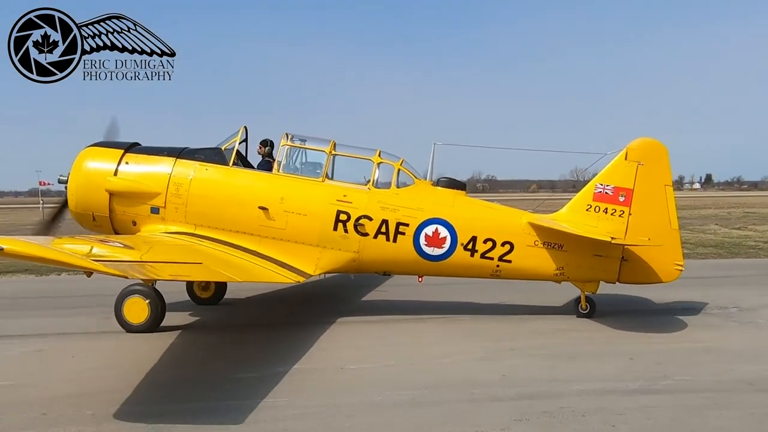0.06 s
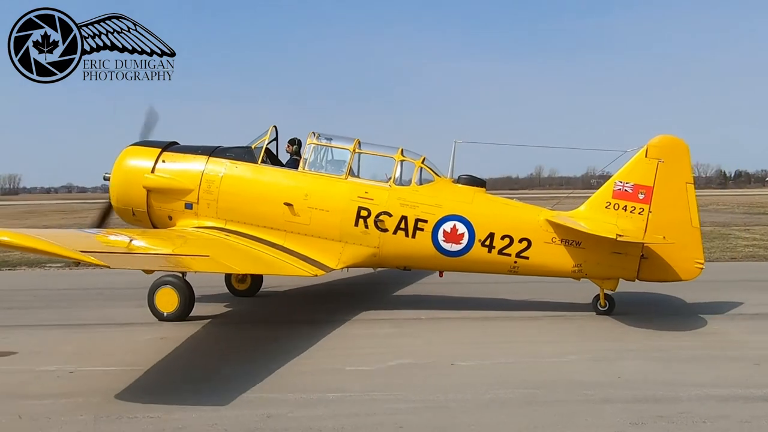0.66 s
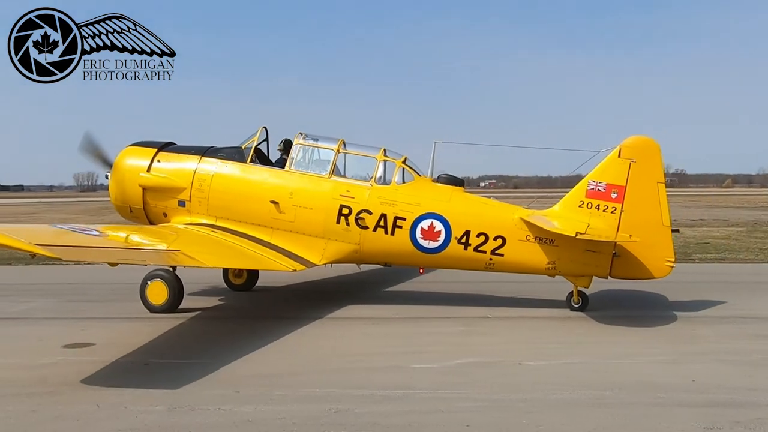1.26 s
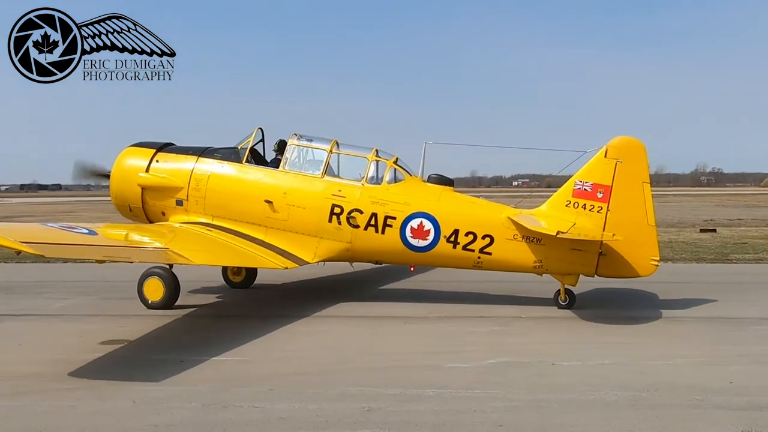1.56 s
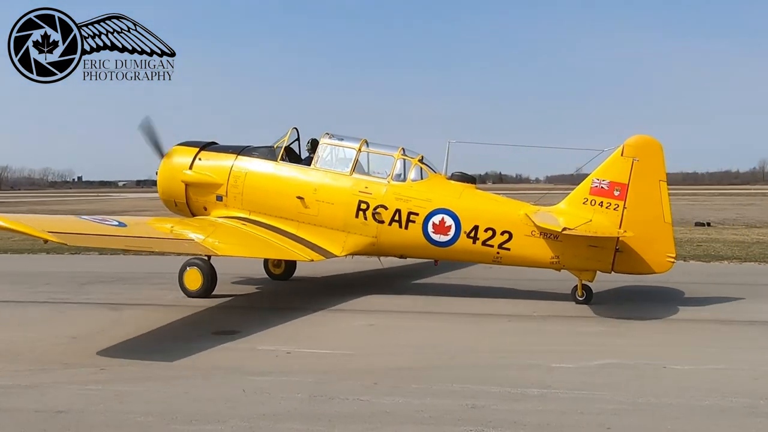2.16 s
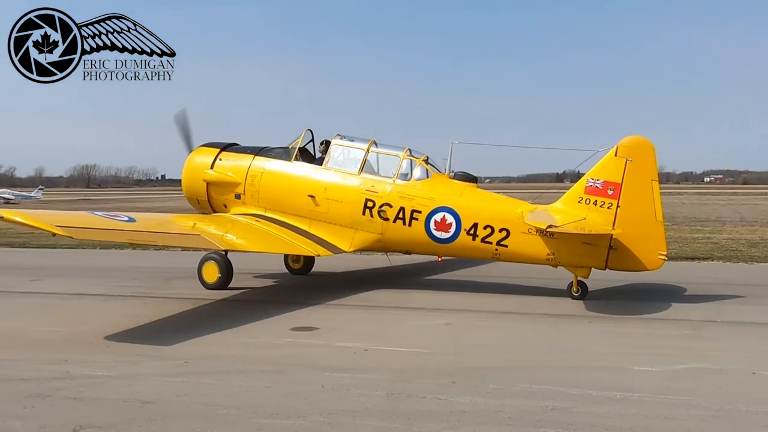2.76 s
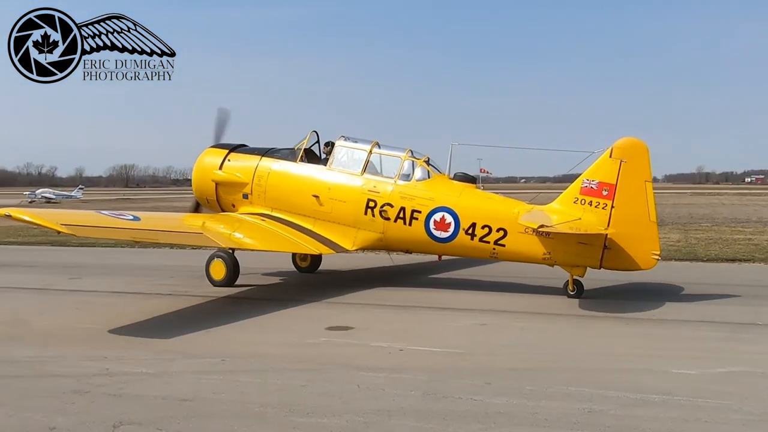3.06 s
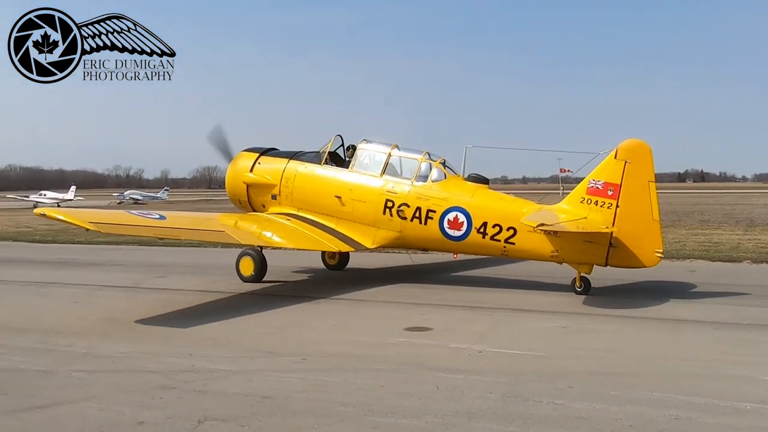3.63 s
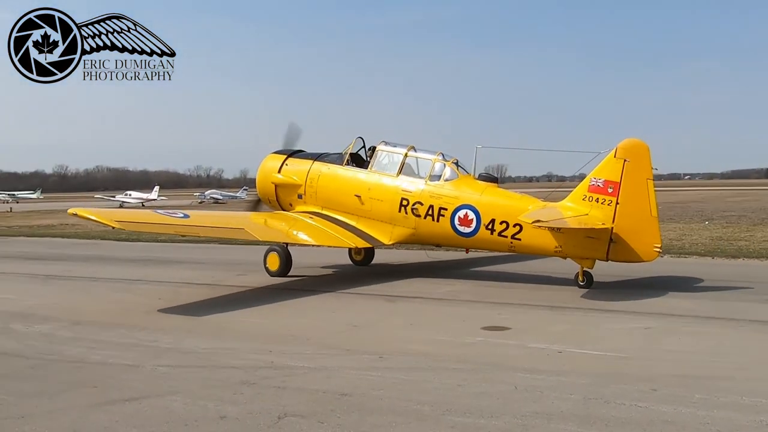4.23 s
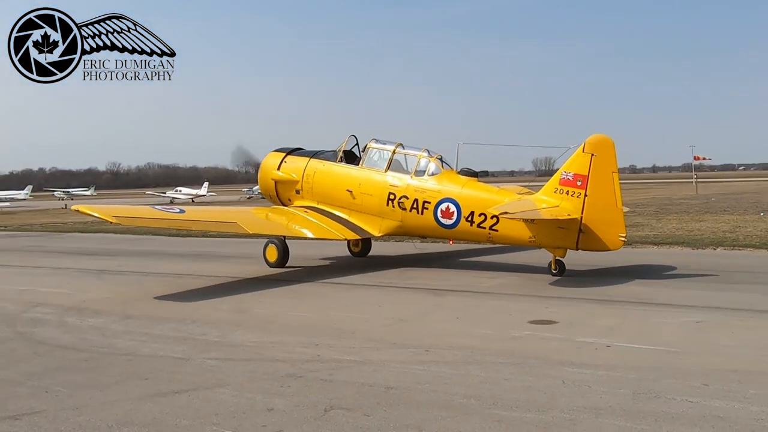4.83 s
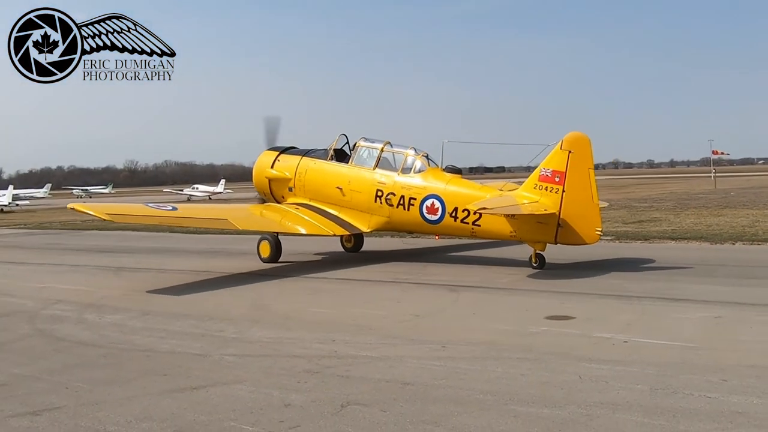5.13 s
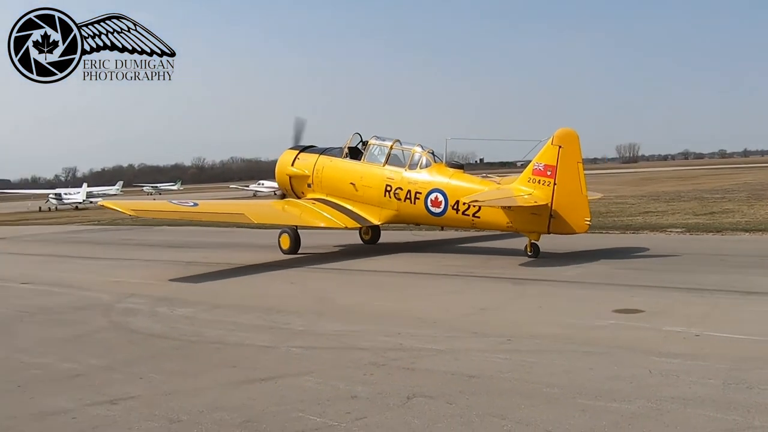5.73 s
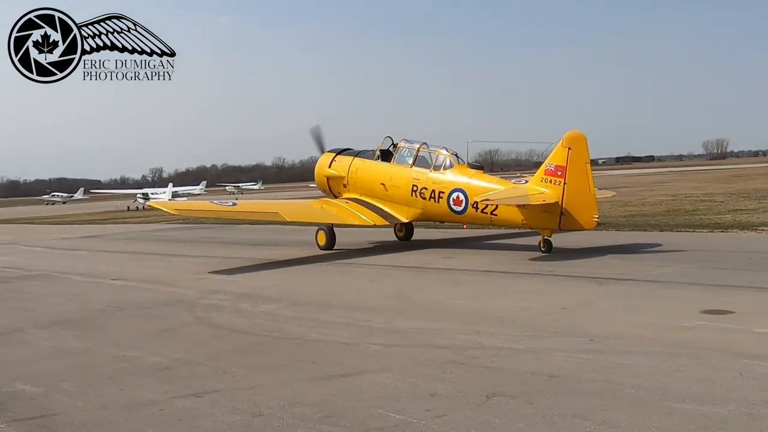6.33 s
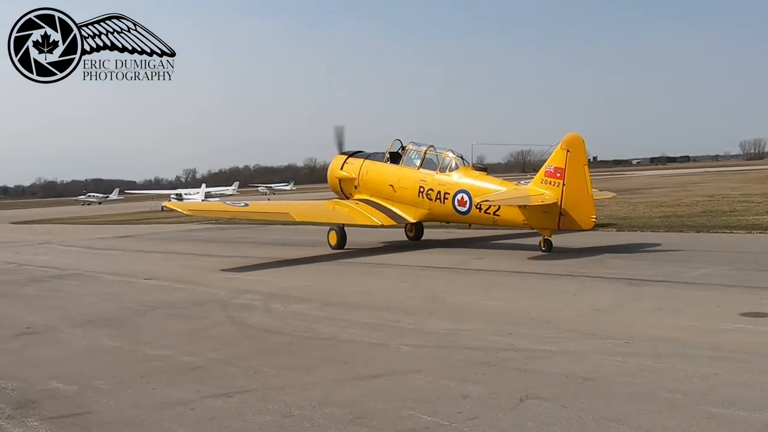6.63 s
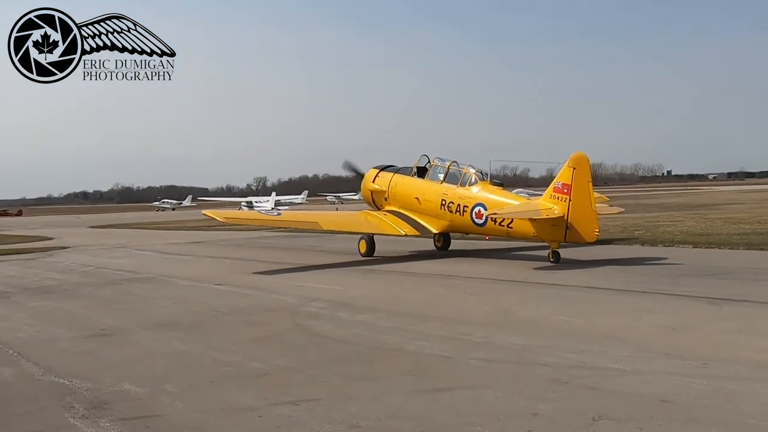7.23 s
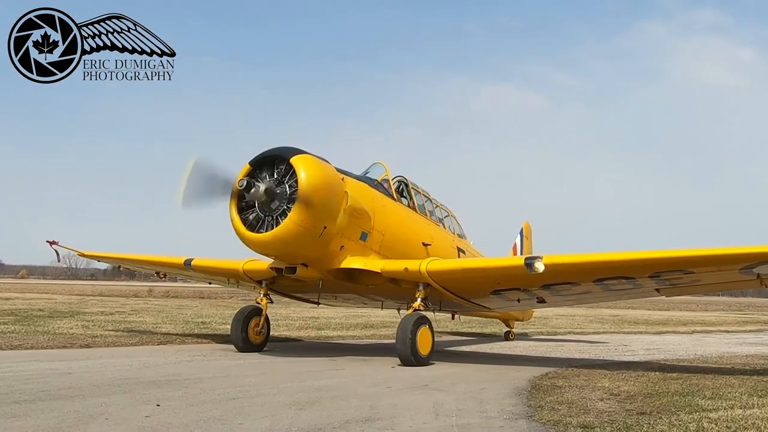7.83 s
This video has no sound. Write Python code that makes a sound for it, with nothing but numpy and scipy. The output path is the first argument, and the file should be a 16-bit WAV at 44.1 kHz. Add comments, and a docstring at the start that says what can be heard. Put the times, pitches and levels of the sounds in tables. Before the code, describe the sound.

Outdoors beside a taxiway, a radial aircraft engine lopes past with a deep, uneven drone and sputtering exhaust, slowing and then speeding up. Two nearby camera shutter clicks and faint brake squeaks come through the propeller's swish and hollow slaps. The exhaust grows throatier as the plane swings away. A sudden cut leads to a short moment of brighter propeller rush with a faint gear whine.

```python
"""A nine-cylinder radial trainer taxis past and turns away, the throttle easing, then opening.
Its firings drone, lope and pop in the exhaust; the two-blade propeller swishes, and slaps in gusts.
A camera shutter snaps twice nearby; the brakes squeak faintly. After an abrupt break a trainer
is heard from the front: brighter propeller wash and a faint gear whine."""
import sys
import numpy as np
from scipy import signal
from scipy.fft import rfft, irfft
from scipy.io import wavfile
from scipy.ndimage import uniform_filter1d, minimum_filter1d

SR = 44100
rng = np.random.default_rng(int(sys.argv[2]) if len(sys.argv) > 2 else 0)


def wav_record(signal):
    """Record a signal, one row per channel, as 16-bit PCM in the file named by sys.argv[1]."""
    frames = np.transpose(np.atleast_2d(signal))
    bounded = np.clip(frames, -1, 1)
    # unit amplitude maps onto the largest positive 16-bit level
    quanta = np.round(bounded * 32767).astype(np.int16)
    wavfile.write(sys.argv[1], SR, quanta)


N = 352359
T = np.arange(N) / SR
CYLINDERS, REVS_PER_CYCLE, BLADES = 9, 2, 2


def from_db(db):
    """Decibels to gain."""
    return 10 ** (np.asarray(db) / 20)


def rms_one(x):
    """Scale to unit rms."""
    return x / np.sqrt(np.mean(x ** 2) + 1e-20)


def in_time(rows):
    """Curve of (seconds, value) rows at every sample."""
    return np.interp(T, *np.transpose(rows))


def noise():
    """White noise."""
    return rng.standard_normal(N)


def coloured(x, colour):
    """Filter to a colour, rms 1. Each row: frequency in Hz, relative level in dB."""
    hz, db = np.transpose(colour)
    log_hz = np.log(np.maximum(np.arange(N // 2 + 1) * SR / N, 1))
    beyond = np.abs(log_hz - np.clip(log_hz, np.log(hz[0]), np.log(hz[-1])))
    gain = from_db(np.interp(log_hz, np.log(hz), db) - 20 * beyond)
    return rms_one(irfft(rfft(x) * gain, N))


def drift(rate_hz):
    """Slow random wander, rms 1."""
    hop = 40
    r = np.exp(-2 * np.pi * rate_hz * hop / SR)
    slow = signal.lfilter([1], [1, -2 * r, r * r], rng.standard_normal(N // hop + 2002))[2000:]
    return np.interp(np.arange(N) / hop, np.arange(len(slow)), rms_one(slow))


def resonate(x, hz, widths_hz):
    """Two-pole resonances in series, one per width; rms 1."""
    for width_hz in widths_hz:
        r = np.exp(-np.pi * width_hz / SR)
        feedback = [1, -2 * r * np.cos(2 * np.pi * hz / SR), r * r]
        x = signal.lfilter(np.array([1, 0, -1]) * (1 - r * r) / 2, feedback, x)
    return rms_one(x)


def tone(turns, scatter_turns=1):
    """Sine of rms 1 with a random starting phase."""
    return np.sqrt(2) * np.sin(2 * np.pi * (turns + scatter_turns * rng.random()))


def burst(start_s, rise_s, decay_s):
    """Envelope: linear rise, exponential decay."""
    age_s = np.maximum(T - start_s, 0)
    decay = np.exp(-np.minimum(np.maximum(age_s - rise_s, 0) / decay_s, 20))
    return np.minimum(age_s / rise_s, 1) * decay


def bell(centre_s, half_s, db):
    """Gain of a bell-shaped swell."""
    return from_db(db) * np.exp(-((T - centre_s) / half_s) ** 2)


def puffs(turns, rise_turns, uneven_db, steady):
    """Noise that swells once a turn, at random strength, over a steady share."""
    strength = from_db(uneven_db * np.clip(rng.standard_normal(2000), -2, 2))[turns.astype(int)]
    age = (turns % 1) / rise_turns
    return noise() * (steady + strength * age ** 2 * np.exp(2 * (1 - age)))


def knock(start_s, hz, rise_s, air):
    """Short thump: a sine and air noise under one rounded envelope."""
    age_s = np.clip(T - start_s, 0, rise_s * 20)
    swell = (age_s / rise_s * np.exp(1 - age_s / rise_s)) ** 2
    return swell * (np.sin(2 * np.pi * hz * age_s) + air)


def exhaust(cycles, drone_db, overtone_db, rumble_db, bark_db, behind):
    """Firings drone; unequal pipes add throbbing overtones, uneven combustion rumble and bark."""
    # Each row: multiple of the four-stroke cycle rate, relative dB side on, relative dB from behind.
    pipe_orders = [(7, -3.5, -3), (8, -3.5, -16.5), (11, -6.5, -17), (12, -7.5, -15), (14, 4, 2),
                   (15, -2, -7.5), (16, -3.5, 2.5), (18, -9, -2.5), (20, 1, -7.5), (21, -4.5, -5),
                   (22, -7.5, -9.5), (23, -11, -9.5), (24, -14, -13), (26, -13, -16), (27, -8.5, -13.5),
                   (28, -13, -11.5), (32, -19.5, -13), (33, -18, -12), (37, -17, -16.5)]
    # Spectra. Each row: frequency in Hz, relative level in dB.
    rumble_colour = [(15, -22.5), (25, -6), (36, 3.5), (52, 0), (80, 0), (125, 0), (160, -8), (210, -11.5),
                     (420, -45)]
    bark_colour = [(110, -32), (170, 7), (230, 0.5), (320, -2), (420, -5.5), (650, -16), (1500, -40)]
    # Relative bark of each cylinder, in firing order.
    cylinder_db = [2, -3, 0, -3.5, 2, -1, 0, 2, -6]
    firings = cycles * CYLINDERS
    drone = from_db(drone_db) * tone(firings)
    overtones = 0
    for order, side_db, rear_db in pipe_orders:
        db = side_db + behind * (rear_db - side_db) + 2.5 * drift(2)
        overtones += from_db(db) * tone(order * cycles, scatter_turns=0.6)
    overtones = from_db(overtone_db) * rms_one(overtones)
    long_puffs = puffs(firings, rise_turns=0.29, uneven_db=-0.5, steady=0.46)
    rumble = from_db(rumble_db) * coloured(long_puffs, rumble_colour)
    cylinder_gain = from_db(cylinder_db)[firings.astype(int) % CYLINDERS]
    short_puffs = cylinder_gain * puffs(firings, rise_turns=0.15, uneven_db=3, steady=0.69)
    bark = from_db(bark_db) * coloured(short_puffs, bark_colour)
    return drone + overtones + rumble + bark


def sputter_gain(edge_db=-4):
    """Bouts of extra bark after throttle changes."""
    # Each row: start in seconds, end in seconds, mid-bout level in dB.
    bouts = [(-.15, 0.124, -39), (0.153, 1.453, -44.5), (1.48, 1.833, -43), (2.603, 3.113, -46.5),
             (3.444, 3.62, -43.5), (4.043, 4.47, -43.5), (5.15, 5.516, -44.5)]
    gain = 0
    for start_s, end_s, db in bouts:
        place = np.clip(2 * (T - start_s) / (end_s - start_s) - 1, -1, 1)
        gain += from_db(db + edge_db * place ** 2) * (np.abs(place) < 1)
    return gain


def propeller(passes, drone_db):
    """Loaded blades thrum and swish, the tips hiss, the slipstream sizzles; gusts slap and howl."""
    # Level curves. Each row: time in seconds, level in dB before any trim.
    swish_curve = [(0.0, -48), (1.6, -50), (1.88, -53.5), (3.0, -51), (3.56, -47.5), (4.12, -49),
                   (4.6, -57.5), (4.85, -56), (5.3, -50.5), (5.6, -54.5), (7.28, -48.5), (7.52, -51)]
    hiss_curve = [(0.0, -56.5), (1.05, -54), (1.55, -56.5), (1.72, -60), (2.1, -60), (3.28, -56),
                  (3.84, -56), (4.4, -62.5), (5.12, -58.5), (5.72, -64), (6.65, -65), (6.95, -62),
                  (7.52, -66)]
    sizzle_curve = [(0, -78), (.9, -102), (2.2, -88), (3.2, -77), (3.8, -79), (4.4, -85.5), (7.5, -87.5)]
    # Spectra. Each row: frequency in Hz, relative level in dB.
    swish_colour = [(250, -8.5), (420, -5), (560, -2.5), (780, -2.5), (1000, -6.5), (1380, -8.5),
                    (1750, -16), (2300, -23), (5000, -41)]
    hiss_colour = [(900, -14), (1700, 1), (2300, 2), (3100, 1.5), (3700, -4), (4400, -7.5), (5100, -12.5),
                   (5900, -22), (7000, -36), (7900, -23.5), (8800, -38.5), (10300, -32.5), (12000, -47)]
    sizzle_colour = [(5000, -7), (8000, -1.5), (10500, -8.5), (12000, -19)]
    thrum = from_db(-45 + 0.5 * (drone_db + 35)) * tone(passes)  # blade loading grows with power
    stirred_air = puffs(passes, rise_turns=0.12, uneven_db=6, steady=2.23)
    swish = from_db(in_time(swish_curve) + 0.5) * coloured(stirred_air, swish_colour)
    tip_air = puffs(passes, rise_turns=0.13, uneven_db=2.5, steady=1.64)
    hiss = from_db(in_time(hiss_curve) - 1.23) * coloured(tip_air, hiss_colour)
    sizzle = from_db(in_time(sizzle_curve)) * coloured(noise(), sizzle_colour)
    return thrum + swish + hiss + sizzle + slaps() + howl(tip_air)


def rasp(firings):
    """The open stack rasps in short swells, one tearing puff per firing."""
    # Each row: centre in seconds, half length in seconds, level in dB.
    swells = [(0.35, 0.047, -45.5), (0.565, 0.02, -44.5), (0.704, 0.02, -47), (1.117, 0.049, -47),
              (1.582, 0.023, -43.5)]
    # Each row: frequency in Hz, relative level in dB.
    colour = [(500, 7), (1100, 9), (1800, -6), (4000, -19.5), (7000, -46)]
    gas = puffs(firings, rise_turns=0.2, uneven_db=2.5, steady=0.7)
    return sum(bell(*row) for row in swells) * coloured(gas, colour)


def pops(pipe_hz=293, puff_db=-9.5, trim_db=-2):
    """Unburnt mixture goes off in the pipe: a low chug with a dull puff."""
    # Each row: start in seconds, level in dB before trim.
    late_firings = [(0.393, -31), (0.545, -32.5), (1.129, -29), (1.327, -29.5), (1.368, -31.5),
                    (1.526, -32), (1.556, -30), (1.762, -33), (2.801, -34.5), (2.885, -39), (2.907, -30.5),
                    (2.971, -29.5), (4.235, -36), (4.254, -31.5), (4.284, -29), (4.315, -26)]
    # Each row: frequency in Hz, relative level in dB.
    gas_colour = [(150, -12), (280, -1), (400, 6.5), (600, 8), (1100, -6), (1600, -15), (3000, -33),
                  (6000, -59)]
    gas = from_db(puff_db) * coloured(noise(), gas_colour)
    out = 0
    for start_s, db in late_firings:
        hz = pipe_hz * np.exp(0.11 * rng.standard_normal())
        out += from_db(db + trim_db) * knock(start_s, hz, rise_s=0.0031, air=gas)
    return out


def shutter(case_hz=1675, upper_hz=1980, spring_hz=6550):
    """Mirror up, two curtains, mirror down: snaps ring a small case, and a spring rings on."""
    # Each row: start in seconds, gain in dB.
    presses = [(1.195, 1), (4.406, -4)]
    # Each row: delay in seconds, relative snap dB, snap decay in seconds, relative case ring dB.
    contacts = [(0, -48, 0.022, -49), (0.0217, -40, 0.014, -55), (0.0427, -55, 0.0067, -44),
                (0.0544, -42.5, 0.0052, -54), (0.077, -47, .012, -50), (.087, -45, 0.013, -47),
                (0.11, -53, 0.004, -44)]
    # Each row: frequency in Hz, relative level in dB.
    snap_colour = [(900, 17), (1800, 13.5), (4000, 4.5), (5300, -0.5), (6200, -5), (7150, 1), (8500, -15),
                   (10400, -21), (12000, -53)]
    snap_gain, case_gain, spring_gain = 0, 0, 0
    for start_s, db in presses:
        for delay_s, snap_db, decay_s, case_db in contacts:
            snap_gain += from_db(db + snap_db) * burst(start_s + delay_s, 0.0012, decay_s)
            case_gain += from_db(db + case_db) * burst(start_s + delay_s, 0.002, decay_s=0.01)
        spring_gain += from_db(db - 76) * burst(start_s + 0.026, 0.02, decay_s=0.38)
    case = tone(case_hz * T + 0.32 * drift(50))
    case += from_db(-8) * tone(upper_hz * T + 0.21 * drift(60))
    spring = resonate(noise(), spring_hz, widths_hz=(400, 600))
    return snap_gain * coloured(noise(), snap_colour) + case_gain * case + spring_gain * spring


def brake_squeaks():
    """A touch of brake sings briefly in a narrow band."""
    # Each row: centre in seconds, half length in seconds, pitch in Hz, level in dB.
    touches = [(2.414, 0.11, 1400, -56), (3.84, 0.08, 3120, -64.5)]
    return sum(bell(centre_s, half_s, db) * resonate(noise(), hz, widths_hz=(110, 220))
               for centre_s, half_s, hz, db in touches)


def slaps(crack_db=-13.5):
    """A blade cutting a gust gives a hollow knock with a crisp edge."""
    # Each row: start in seconds, level in dB, pitch in Hz.
    hits = [(3.072, -37, 700), (3.104, -33.5, 705), (3.136, -29.5, 656), (3.168, -28.5, 666),
            (3.201, -31, 670), (3.391, -35, 760), (4.011, -37, 750), (4.069, -35, 600), (4.107, -35, 483),
            (4.135, -31.5, 584), (4.162, -33, 600), (4.915, -36, 690), (4.995, -35, 690),
            (5.02, -36.5, 680), (5.075, -33, 660), (5.127, -38, 700), (5.153, -47, 660), (5.235, -34, 350),
            (5.257, -39, 390), (5.284, -33.5, 483), (5.311, -34, 378), (5.392, -37, 666), (5.417, -31, 470),
            (5.446, -31.5, 437), (5.47, -30, 420), (5.498, -38, 604)]
    crack_colour = [(400, 1.5), (900, 6), (1400, -3.5), (2700, -5), (4500, -31), (6500, -36)]
    crack = from_db(crack_db) * coloured(noise(), crack_colour)
    return sum(from_db(db) * knock(start_s, hz, rise_s=0.0018, air=crack) for start_s, db, hz in hits)


def howl(chopped_air, pitch_hz=766):
    """In a gust the chopped air takes on a hollow pitch."""
    # Each row: centre in seconds, half length in seconds, level in dB.
    gusts = [(3.27, 0.14, -50.5), (5.08, 0.22, -54.5)]
    return sum(bell(*row) for row in gusts) * resonate(chopped_air, pitch_hz, widths_hz=(160, 320))


def taxiing(closest_m=17.2, closest_s=0.54, speed_m_per_s=3.28, turn_start_s=4.85, turn_s=2.35):
    """The aircraft rolls past at a steady pace, then swings its exhaust towards the listener."""
    # Engine speed. Each row: time in seconds, firings per second.
    speed_curve = [(0, 78.2), (.45, 75.6), (.9, 70.8), (1.6, 66.4), (2.4, 62.2), (2.8, 64.5), (3.2, 70.3),
                   (4, 79.3), (4.4, 82.1), (4.8, 84.1), (5.6, 86.1), (6, 85.8), (7, 81.3), (7.3, 80),
                   (7.58, 79.8)]
    # Firing tone, following the throttle. Each row: time in seconds, level in dB.
    drone_curve = [(0.0, -36), (0.24, -50.5), (0.6, -34.5), (1.0, -51.5), (1.12, -34), (1.28, -41.5),
                   (1.56, -35.5), (1.8, -47), (1.96, -42), (2.4, -39), (3.15, -35.5), (4.08, -31),
                   (4.4, -39), (5.28, -31.5), (7.52, -35.0)]
    cycles = np.cumsum(in_time(speed_curve)) / SR / CYLINDERS
    drone_db = in_time(drone_curve)
    distance_m = np.hypot(closest_m, speed_m_per_s * (T - closest_s))
    distance_db = 20 * np.log10(closest_m / distance_m)
    turned = np.sin(np.pi / 2 * np.clip((T - turn_start_s) / turn_s, 0, 1))
    behind = turned ** 3.9  # the pipe radiates a narrow beam
    overtone_db = -43.5 + distance_db + 14.5 * turned + 0.44 * (drone_db - drone_db.max())
    # Combustion evens out with power, so the rumble drops.
    rumble_db = -36 + distance_db - 3 * turned - 0.12 * (drone_db - drone_db.mean())
    bark_gain = from_db(-48 + distance_db + 10 * behind)
    bark_db = 20 * np.log10(np.hypot(bark_gain, sputter_gain()))
    engine = exhaust(cycles, drone_db, overtone_db, rumble_db, bark_db, behind)
    engine += pops() + rasp(cycles * CYLINDERS)
    return engine + propeller(cycles * REVS_PER_CYCLE * BLADES, drone_db) + brake_squeaks()


def head_on(firing_hz=83.5):
    """From the front: bright propeller wash over the exhaust; each blade cracks and gives a low beat."""
    # Each row: time in seconds, wash level in dB before trim.
    wash_curve = [(7.61, -44.5), (7.802, -39), (7.99, -39)]
    # Spectra. Each row: frequency in Hz, relative level in dB.
    wash_colour = [(200, -5), (400, 0), (800, 2.5), (1400, 4), (2400, -3), (3100, -1.5), (3700, -8),
                   (4400, -11), (5600, -24), (7500, -31.5), (10000, -37), (12000, -44)]
    beat_colour = [(110, 7), (350, 5), (600, 0), (1200, -29), (3000, -41)]
    wash_db = in_time(wash_curve)
    swell_db = wash_db - wash_db.max()
    cycles = (T + 0.007) * firing_hz / CYLINDERS
    passes = cycles * REVS_PER_CYCLE * BLADES
    cracks = np.diff(np.floor(passes), prepend=0) * from_db(2.9 * np.clip(noise(), -2, 2))
    air = rms_one(puffs(passes, rise_turns=0.075, uneven_db=2.5, steady=1.6))
    air += from_db(-13) * rms_one(cracks)
    wash = from_db(wash_db - 1.44) * coloured(air, wash_colour)
    engine = exhaust(cycles, drone_db=-39.5, overtone_db=-39, rumble_db=-38, bark_db=-44.5, behind=0.62)
    beat = from_db(-48) * coloured(cracks, beat_colour)
    thrum = from_db(-40) * tone(passes)
    return from_db(0.5 * swell_db) * (engine + beat) + wash + thrum + from_db(swell_db) * gear_whine()


def gear_whine():
    """Thin gear tones that waver in level and phase."""
    # Each row: frequency in Hz, level in dB.
    partials = [(1410, -59), (2266, -63), (2676, -64), (2821, -59), (3532, -69)]
    return sum(from_db(db + 2.9 * drift(4.3)) * tone(hz * T + 0.079 * drift(8)) for hz, db in partials)


def scene(break_start_s=7.577, break_end_s=7.594, fade_s=0.0066):
    """Taxi pass and shutter over faint hiss, a brief silence, then a dry tick and the front sound."""
    # Background hiss. Each row: frequency in Hz, relative level in dB.
    floor_colour = [(1000, 0.5), (4000, 4.5), (6500, -10), (7900, 4), (9000, -4.5), (10400, -8),
                    (12000, -25.5)]
    floor = from_db(-81) * coloured(noise(), floor_colour)
    before = np.clip((break_start_s - T) / fade_s, 0, 1)
    after = T >= break_end_s
    tick = from_db(-26) * burst(break_end_s, rise_s=1 / SR, decay_s=0.00005)
    return (before * (taxiing() + shutter() + floor) + after * head_on() + tick)[None]


def record(dry, ceiling_db=-22.5, release_db_per_s=120, cutoff_hz=12000):
    """Fast peak limiter, then a steep low-pass."""
    level_db = 20 * np.log10(np.abs(dry[0]) + 1e-9)
    held_db = np.maximum.accumulate(level_db + release_db_per_s * T) - release_db_per_s * T
    gain_db = np.minimum(ceiling_db - held_db, 0)
    gain_db = uniform_filter1d(minimum_filter1d(gain_db, size=200), size=200)
    low_pass = signal.butter(12, cutoff_hz, fs=SR, output="sos")
    return signal.sosfilt(low_pass, dry * from_db(gain_db))


dry = scene()
out = record(dry)
wav_record(out)
```